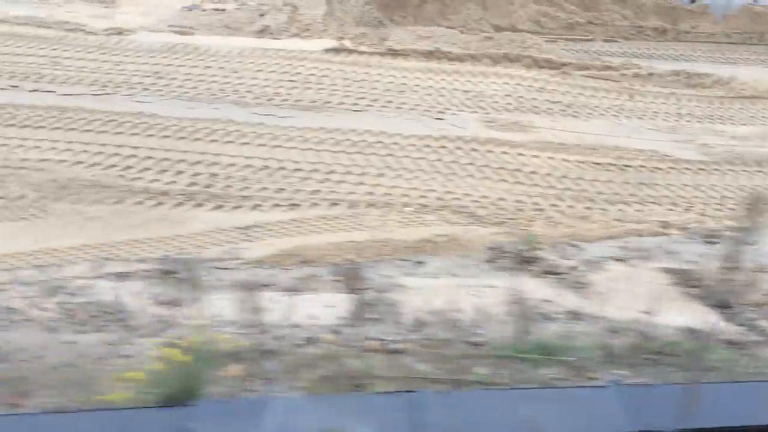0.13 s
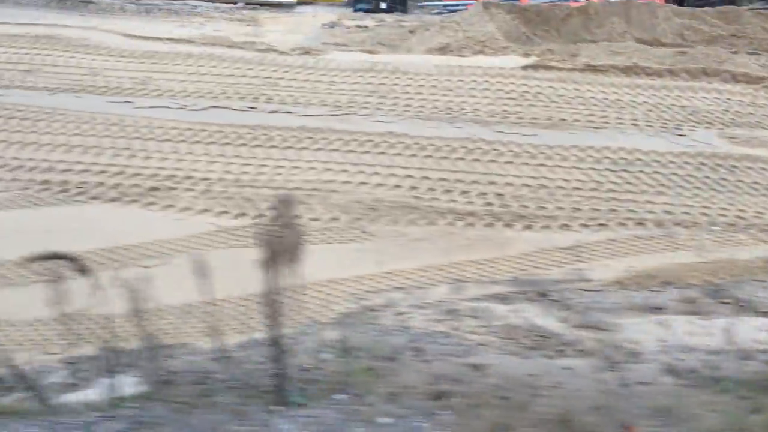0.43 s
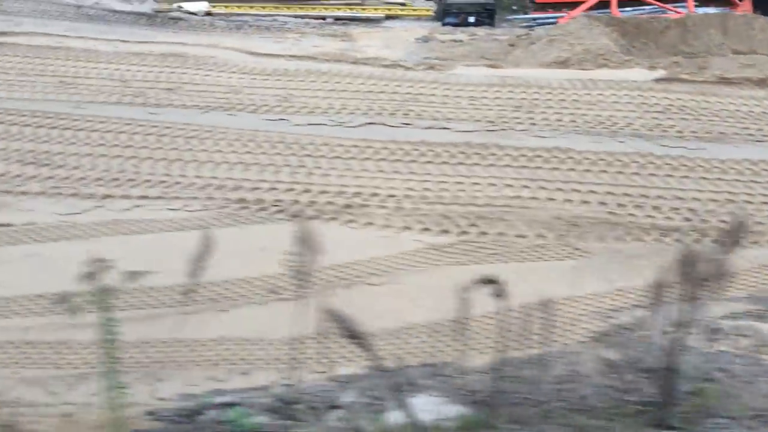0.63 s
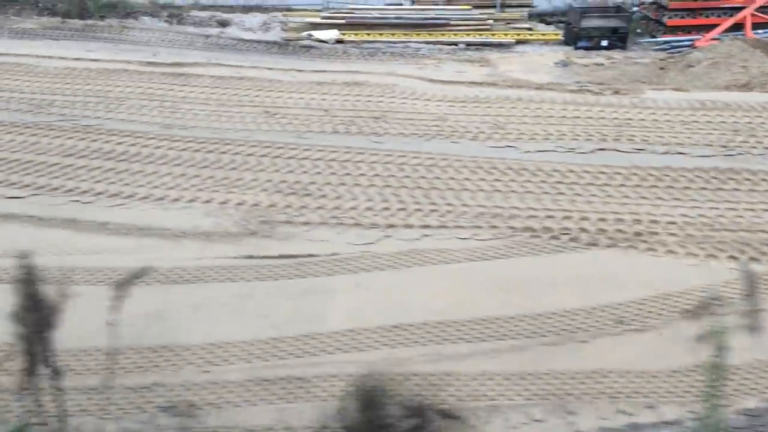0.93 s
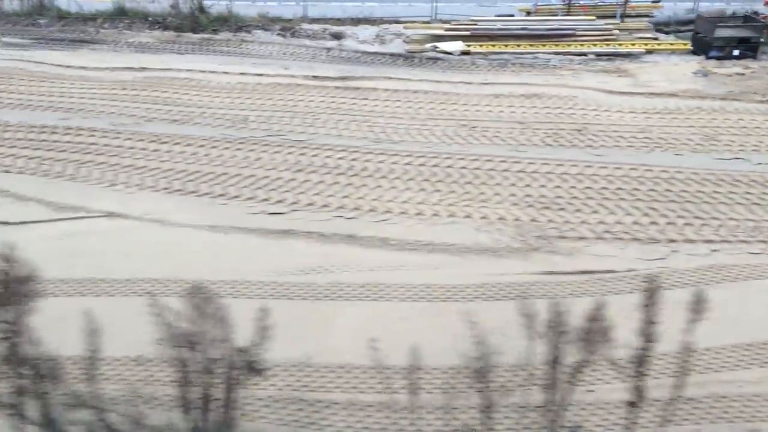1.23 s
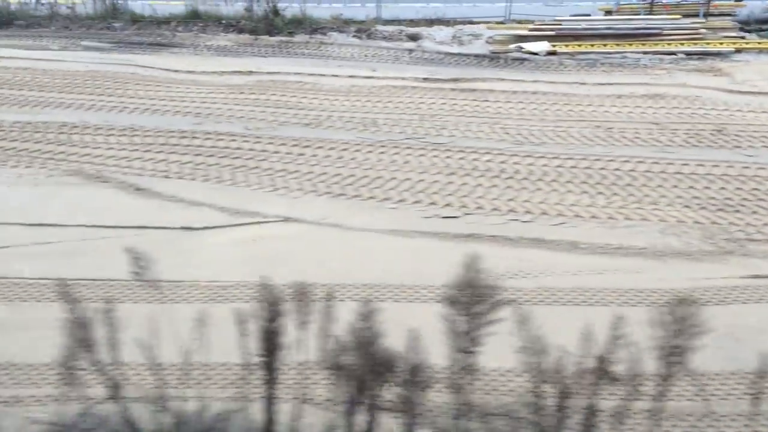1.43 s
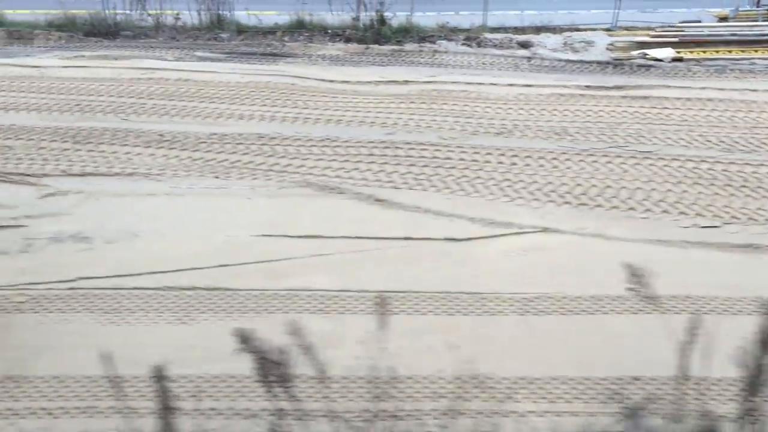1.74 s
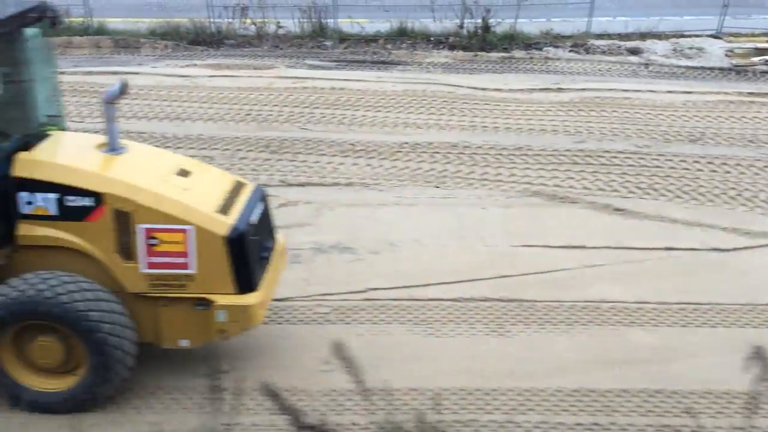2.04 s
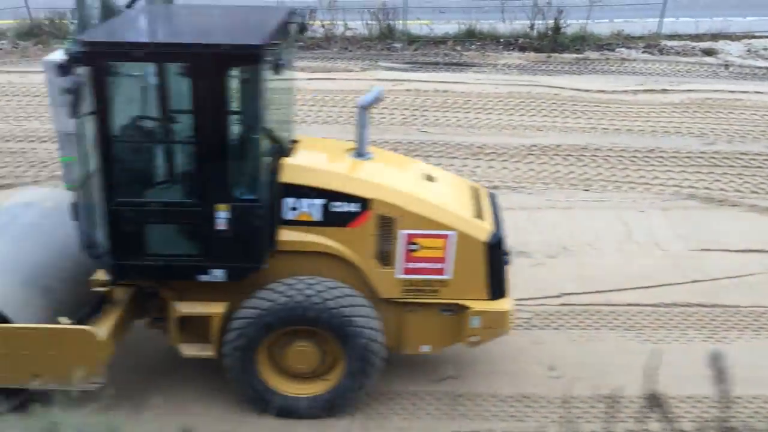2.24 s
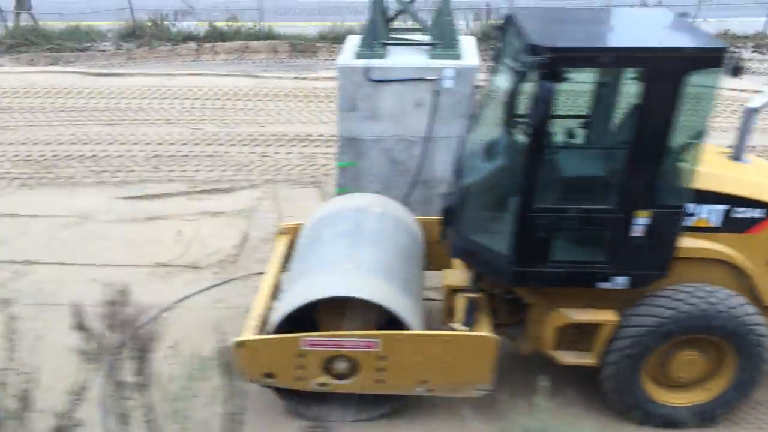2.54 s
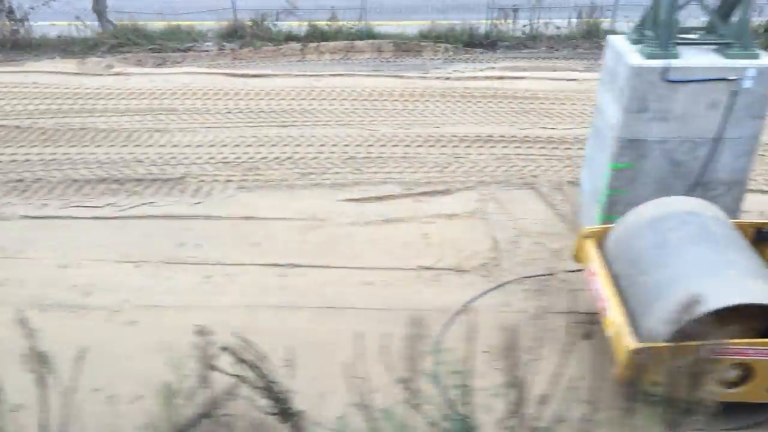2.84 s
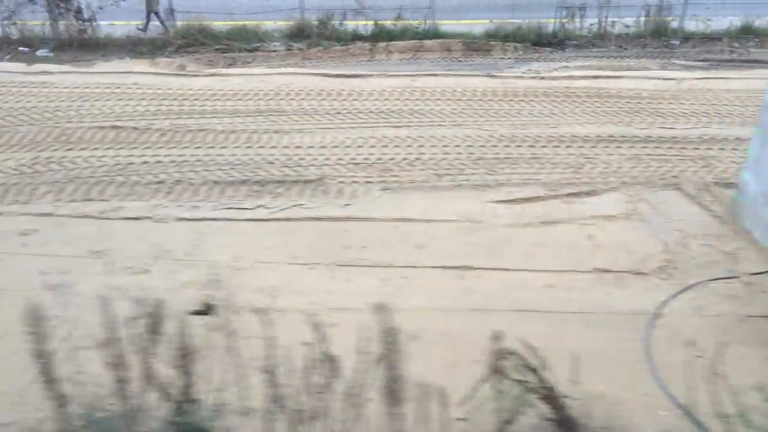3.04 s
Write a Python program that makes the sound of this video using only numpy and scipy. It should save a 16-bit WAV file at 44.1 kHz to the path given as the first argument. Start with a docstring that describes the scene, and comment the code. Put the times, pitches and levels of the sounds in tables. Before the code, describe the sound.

A passenger train rumbles and drones steadily, heard from inside the carriage, with faint high rubbing at first. At about 0.9 seconds a compartment door slides with a hiss and squeak, then bangs shut with a loud rattle just after 1 second. The rumble dips briefly and recovers. Around 2.4 seconds the latch clacks with a small squeak, and soft rubbing returns near 3 seconds.

```python
"""First comes the rumble of a rolling passenger train, heard from inside: the wheels roar through
the floor and the carriage drones. Something, probably a compartment door, rubs softly and sings
faintly, then slides with a hiss and a squeak and bangs shut with a rattle.
An automatic gain control turns everything down for a moment after the bang.
Later the latch clacks and the soft rubbing returns."""
import sys
import numpy as np
from scipy import signal
from scipy.fft import rfft, irfft
from scipy.io import wavfile
from scipy.ndimage import uniform_filter1d

SR = 44100
rng = np.random.default_rng(int(sys.argv[2]) if len(sys.argv) > 2 else 0)


def master(y):
    """Save y as 16-bit WAV."""
    cut = np.clip(np.atleast_2d(y).T, -1, 1)
    pcm = np.round(cut * 32767)  # scale
    wavfile.write(sys.argv[1], SR, pcm.astype(np.int16))


N = 141120
TIME = np.arange(N) / SR


def amp(db):
    """Turns decibels into a gain."""
    return 10 ** (np.asarray(db) / 20)


def unit(x):
    """Scales a signal to an average power of one."""
    return x / np.sqrt(np.mean(x ** 2) + 1e-20)


def value_at(points, hz):
    """Looks up a table between its rows, on a logarithmic frequency scale."""
    row_hz, value = np.transpose(points)
    return np.interp(np.log(hz + 1), np.log(row_hz + 1), value)


def envelope(points):
    """A gain that follows rows of seconds and dB, silent before and after them."""
    s, db = np.transpose(points)
    return amp(np.interp(TIME, s, db)) * (TIME >= s[0]) * (TIME <= s[-1])


def add(mix, start_s, sound):
    """Mixes a sound in at its start time."""
    part = mix[max(round(start_s * SR), 0):][:len(sound)]
    part += sound[:len(part)]


def tone_gain(colour, peaks, hz):
    """Gain at each frequency: a broad colour (the balance of bass and treble) plus resonant peaks."""
    peaks_db = sum(db / (1 + (2 * (hz - centre) / width) ** 2) for centre, width, db in peaks)
    return amp(value_at(colour, hz) + peaks_db)


def noise(colour, peaks=(), patchy_db=0, flicker_db=0):
    """Coloured noise that wavers in patches of pitch and flickers as a whole."""
    bands = signal.stft(rng.standard_normal(N), nperseg=512)[2]
    patches = uniform_filter1d(rng.standard_normal(bands.shape), size=7, axis=0)
    patches = unit(uniform_filter1d(patches, size=9, axis=1))
    flicker = unit(uniform_filter1d(rng.standard_normal(bands.shape[1]), size=4))
    uneven = signal.istft(bands * amp(patchy_db * patches + flicker_db * flicker))[1][:N]
    gain = tone_gain(colour, peaks, np.fft.rfftfreq(N, 1 / SR))
    return unit(irfft(rfft(uneven) * gain, N))


def resonance(hz, width_hz):
    """One note kept ringing by random shaking."""
    offset_hz = np.fft.rfftfreq(N, 1 / SR) - hz
    return unit(irfft(rfft(rng.standard_normal(N)) / (1 + (offset_hz / width_hz) ** 2), N))


def arch(length_s):
    """A rounded rise and fall."""
    t = np.arange(0, length_s, 1 / SR)
    return np.sqrt(abs(np.sin(np.pi * t / length_s)))


# Colours of the floor's rumble and the wheels' roar. Each row: frequency in Hz, relative level in dB.
RUMBLE_COLOUR = [(12, -67), (20, -35), (40, -6.5), (80, -0.5), (98, 0.5), (130, 1), (186, 2), (222, -9),
                 (256, -7.5), (340, -18.5), (440, -35), (750, -120)]
ROAR_COLOUR = [(180, -13), (300, -11.5), (424, -3), (460, -7.5), (598, -8.5), (671, -7), (1060, -13),
               (1250, -11.5), (2620, -25.5), (3250, -30), (6370, -44), (7640, -46), (8430, -47.5),
               (15200, -57.5)]
# Carriage resonances in the roar. Each row: pitch in Hz, width in Hz, boost in dB.
BODY_PEAKS = [(518, 14, 3.5), (565, 27, 4), (625, 9.2, 2), (637, 9.9, 3), (885, 17, 5.5), (1198, 26, -0.5),
              (1483, 7.4, 1.5), (1747, 7.3, -2.5), (1910, 29, -1.5)]
# The carriage's drone. Each row: pitch in Hz, width in Hz, level in dB.
DRONE_NOTES = [(133.4, 3.8, -43), (168.4, 11, -47.5), (253, 4.9, -51.5), (381, 16.4, -52.5),
               (473, 41, -51.5)]
# How the whole ride swells. Each row: time in seconds, level change in dB.
RIDE_SWELL = [(.08, 2.5), (.3, -0.2), (.45, 2.3), (.75, 2.1), (1.0, 2), (1.5, 0.5), (2.2, -0.33),
              (2.8, 0.23), (3.2, -0.2)]

def carriage():
    """The rolling wheels roar, rumble through the floor and keep the carriage droning."""
    rumble = amp(-31) * noise(RUMBLE_COLOUR, flicker_db=0.86)
    roar = amp(-42.5) * noise(ROAR_COLOUR, BODY_PEAKS, patchy_db=1.67, flicker_db=0.4)
    drone = sum(amp(db) * resonance(hz, width) for hz, width, db in DRONE_NOTES)
    swell = amp(np.interp(TIME, *np.transpose(RIDE_SWELL)))
    return swell * (rumble + roar + drone)


# The door's tones. Each row: start in seconds, length in seconds, pitch in Hz, width in Hz, level in dB.
DOOR_TONES = [(0, .53, 9260, 260, -69), (0, 0.67, 3146, 100, -61.5), (.08, .16, 5080, 120, -65.5),
              (.4, 0.31, 6170, 60, -75), (1.2, 0.94, 7740, 160, -79.5), (1.6, 0.48, 9700, 400, -80),
              (1.92, 0.076, 7300, 400, -72), (2.95, 0.38, 5100, 90, -70.5)]

def door_singing():
    """The sliding door rubs and sings faintly in thin, high tones that swell and fade."""
    out = np.zeros(N)
    for start, length, hz, width, db in DOOR_TONES:
        swell = arch(length) ** 2
        add(out, start, amp(db) * swell * resonance(hz, width)[:len(swell)])
    return out


# Loudness of the first rubbing. Each row: time in seconds, level in dB.
EARLY_RUB_LEVEL = [(0, -52.5), (.18, -61.5), (.32, -65), (.5, -72.5), (.7, -71.5), (.85, -78)]
# Its colour. Each row: frequency in Hz, relative level in dB.
EARLY_RUB_COLOUR = [(2400, -18), (3700, -14), (4600, -1), (5600, -1), (6800, 2.5), (8200, -4), (10500, -7),
                    (12700, -6), (15000, -11)]

def early_rub():
    """Soft rubbing makes a high hiss that dies away."""
    return envelope(EARLY_RUB_LEVEL) * noise(EARLY_RUB_COLOUR, peaks=[(5030, 200, 6)])


# How long a knock echoes in the carriage. Each row: frequency in Hz, seconds to fade by 60 dB.
CABIN_ECHO = [(150, 0.52), (600, 0.18), (1600, 0.22), (4000, 0.21), (12000, 0.12)]

def knocks(hits, colour, peaks, rise_s):
    """Each knock is a spray of echoes in the carriage, coloured by the part that was struck."""
    out = np.zeros(N)
    t = TIME[:SR // 2]
    for start, db, bright_hz in hits:
        hz, age, bands = signal.stft(rng.standard_normal(len(t)), SR, nperseg=256)
        dulled = bands / np.hypot(1, hz / bright_hz)[:, None]
        decay = amp(-60 * age / value_at(CABIN_ECHO, hz)[:, None])
        echoes = signal.istft(dulled * decay)[1][:len(t)]
        add(out, start, amp(db) * echoes * (1 - np.exp(-t / rise_s)))
    gain = unit(tone_gain(colour, peaks, abs(np.fft.fftfreq(N, 1 / SR))))
    # This filter makes the part ring after each knock, never before it.
    ringing = np.exp(np.conj(signal.hilbert(np.log(gain))))
    return np.fft.ifft(np.fft.fft(out) * ringing).real


# The door's rattles. Each row: start in seconds, level in dB, frequency in Hz where the treble fades.
DOOR_RATTLES = [(.443, -37.5, 4000), (1.019, -27, 500), (1.030, -22, 3000), (1.037, -18.5, 1800),
                (1.045, -17, 9000), (1.057, -19.5, 6000), (1.068, -16.5, 3000), (1.079, -20, 3000),
                (1.091, -23.5, 2000), (1.11, -29, 1497), (1.2, -31.5, 2500)]
# The door panel's colour. Each row: frequency in Hz, relative level in dB.
PANEL_COLOUR = [(150, 9.5), (300, 5), (600, 3.5), (800, 3.5), (1500, 2), (2300, -7), (2750, -13),
                (3300, -11.5), (4300, -21), (6500, -19.5), (10000, -45), (15000, -38)]
# Its resonances. Each row: pitch in Hz, width in Hz, boost in dB.
PANEL_PEAKS = [(443, 15, 7.8), (553, 12, 12.4), (613, 16, 13), (647, 23, 7.4), (849, 9.9, 10),
               (1120, 12, 2), (1243, 16, 4), (1310, 74, 1.8), (1356, 39, 6.9), (1618, 54, 3.4),
               (1835, 36, 10), (2215, 38, 8), (2360, 58, 6), (3090, 140, 7)]

def door_rattle():
    """The door knocks about in its frame, and its panel rings."""
    return knocks(DOOR_RATTLES, PANEL_COLOUR, PANEL_PEAKS, rise_s=0.0005)


# Loudness of the door's friction and of its ringing runner. Each row: time in seconds, level in dB.
FRICTION_LEVEL = [(.84, -60), (.885, -42.5), (.93, -45), (1.04, -37), (1.12, -39), (1.21, -39),
                  (1.255, -47.5), (1.3, -56), (1.36, -83)]
RUNNER_LEVEL = [(.86, -71), (.92, -53), (1.02, -49), (1.1, -55), (1.155, -48), (1.25, -52), (1.31, -63),
                (1.38, -69), (1.49, -72), (1.65, -110)]
# The friction's colour. Each row: frequency in Hz, relative level in dB.
FRICTION_COLOUR = [(400, -22), (1200, 11.5), (1750, 2), (3200, -4.5), (3700, -7), (4600, -13), (5500, -11),
                   (7500, -11), (9000, -14.5), (11000, -17.5), (15000, -24)]
# The sliding door's resonances. Each row: pitch in Hz, width in Hz, boost in dB.
DOOR_PEAKS = [(2385, 140, 10.7), (3100, 310, 6.4), (4130, 270, 9.4), (5500, 130, 7.8), (6160, 300, 5.1),
              (7280, 240, 3.7), (10500, 400, 3.4)]

def door_slide():
    """Friction hisses through the door's resonances and keeps its metal runner ringing."""
    hiss = noise(FRICTION_COLOUR, DOOR_PEAKS, patchy_db=1.2, flicker_db=1.4)
    runner = resonance(hz=5155, width_hz=105)
    return envelope(FRICTION_LEVEL) * hiss + envelope(RUNNER_LEVEL) * runner


# The squeaks. Each row: start in seconds, length in seconds, pitch in Hz, level in dB.
SQUEAK_NOTES = [(0.866, 0.051, 2460, -45), (.972, 0.027, 1467, -37), (1, 0.0153, 1463, -30.5),
                (1.045, .017, 1671, -22.5), (2.345, 0.021, 1357, -42.5), (2.426, 0.031, 1259, -39),
                (2.441, 0.026, 1062, -37)]

def squeaks(pitch_wobble=0.026):
    """Surfaces stick and slip, making short tones of unsteady pitch."""
    out = np.zeros(N)
    for start, length, hz, db in SQUEAK_NOTES:
        swell = arch(length)
        waver = unit(uniform_filter1d(rng.standard_normal(N), size=90))[:len(swell)]
        pitch_hz = hz * (1 + pitch_wobble * waver)
        tone = np.sqrt(2) * np.sin(2 * np.pi * np.cumsum(pitch_hz) / SR)
        add(out, start, amp(db) * swell * tone)
    return out


# The door's heavy blows. Each row: start in seconds, level in dB.
DOOR_BLOWS = [(1.0131, -5), (1.067, -7), (1.096, -10)]
# The wall's low notes. Each row: pitch in Hz, relative level in dB, seconds to fade by 60 dB.
WALL_NOTES = [(50.6, -8, 0.47), (87, -5.5, .2), (126.8, 2.5, 0.13), (146.8, 7.5, 0.097), (230.7, -12, 0.21)]

def door_bang(rise_s=0.013, low_cut_hz=42):
    """The door hits its frame, and each blow sets the wall booming."""
    out = np.zeros(N)
    t = TIME[:SR // 2]
    notes = sum(amp(db - 60 * t / fade_s) * np.sin(2 * np.pi * hz * t) for hz, db, fade_s in WALL_NOTES)
    boom = (1 - np.exp(-t / rise_s)) * notes
    for start, db in DOOR_BLOWS:
        add(out, start, amp(db) * boom)
    return signal.sosfilt(signal.butter(2, low_cut_hz, "highpass", fs=SR, output="sos"), out)


# The latch's clacks. Each row: start in seconds, level in dB, frequency in Hz where the treble fades.
LATCH_CLACKS = [(2.349, -36, 5000), (2.421, -28, 3020), (2.428, -31.5, 9000), (2.442, -29.5, 1800),
                (2.451, -37.5, 6000), (2.474, -37.5, 6000)]
# Its colour. Each row: frequency in Hz, relative level in dB.
LATCH_COLOUR = [(250, -16), (600, -1.5), (1100, -4), (1550, -6.5), (2400, -9.5), (2750, -16.5),
                (3300, -14.5), (5000, -29.5), (8000, -37), (15000, -43)]
# Its resonances. Each row: pitch in Hz, width in Hz, boost in dB.
LATCH_PEAKS = [(1025, 74, 7.1), (1270, 150, 14.7), (1800, 45, 4), (2500, 69, 5.5)]

def latch():
    """The latch strikes several times in quick succession and rings briefly."""
    return knocks(LATCH_CLACKS, LATCH_COLOUR, LATCH_PEAKS, rise_s=0.0016)


# Loudness of the last rubbing. Each row: time in seconds, level in dB.
LATE_RUB_LEVEL = [(2.83, -82), (2.9, -59), (3.05, -56), (3.2, -58)]
# Its colour. Each row: frequency in Hz, relative level in dB.
LATE_RUB_COLOUR = [(1800, 1), (2450, 7.5), (3500, -3), (4200, -8), (5200, -15), (6200, -10), (7200, -0.5),
                   (7800, -9), (8400, -1), (9500, -3), (10500, -11), (15000, -9)]

def late_rub():
    """Soft rubbing hisses through the door's resonances."""
    return envelope(LATE_RUB_LEVEL) * noise(LATE_RUB_COLOUR, DOOR_PEAKS)


def scene():
    """Adds the ride, the door and its latch into one channel."""
    ride = carriage()
    door = door_singing() + early_rub() + door_rattle() + door_slide() + squeaks() + door_bang()
    return (ride + door + latch() + late_rub())[None]


def record(dry, threshold_db=-22, squeeze=0.43, hold_s=0.16, recover_db_per_s=60):
    """Gain control dips after loud sounds, holds and recovers; the highest treble is cut off."""
    start_s, fade_in_s, smooth_s, treble_limit_hz = 0.084, 0.003, 0.034, 15330
    power_db = 10 * np.log10(abs(uniform_filter1d(dry[0] ** 2, size=600)) + 1e-12)
    excess_db = np.maximum(power_db - threshold_db, 0)
    delayed_db = [np.interp(TIME - lag, TIME, excess_db) for lag in np.linspace(0, hold_s, 12)]
    held_db = np.max(delayed_db, axis=0)
    # After the hold, the excess falls away at a steady rate.
    fall_db = TIME * recover_db_per_s
    easing_db = np.maximum.accumulate(held_db + fall_db) - fall_db
    smoothing = np.exp(-1 / (smooth_s * SR))
    dip_db = squeeze * signal.lfilter([1 - smoothing], [1, -smoothing], easing_db)
    fade_in = np.clip((TIME - start_s) / fade_in_s, 0, 1)
    treble_cut = signal.firwin(1023, treble_limit_hz, window=("kaiser", 9), fs=SR)
    return signal.oaconvolve(dry * amp(-dip_db) * fade_in, treble_cut[None], "same")


dry = scene()
out = record(dry)
master(out)
```